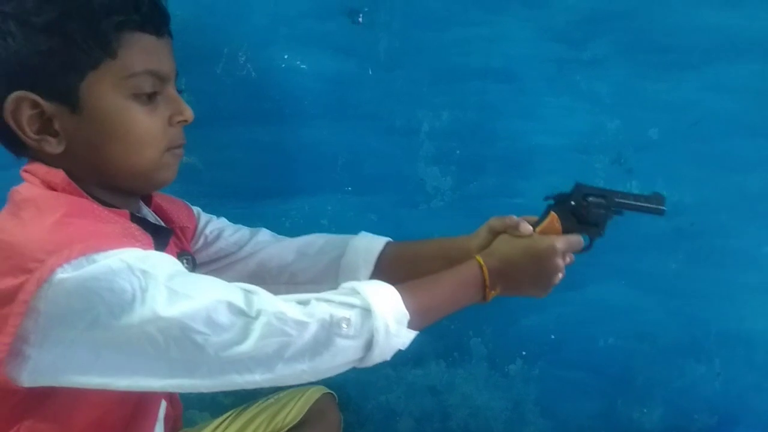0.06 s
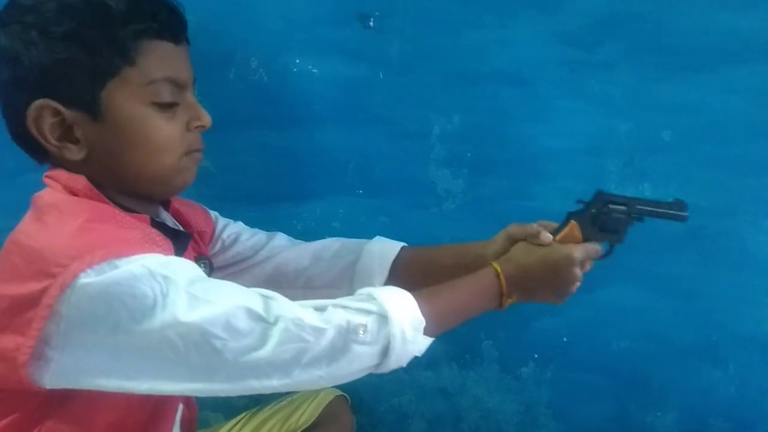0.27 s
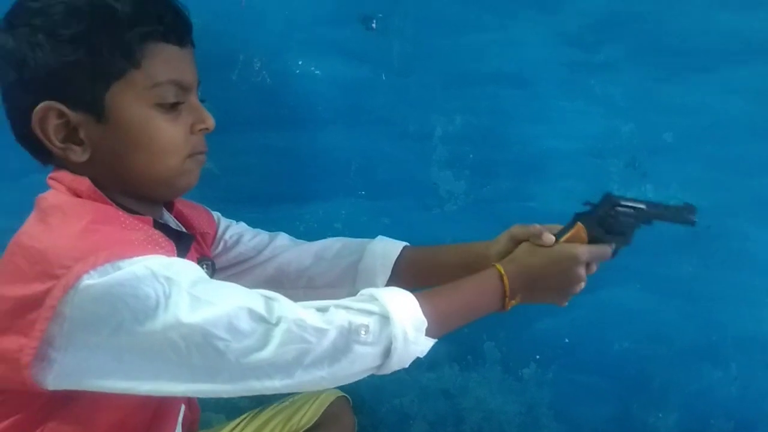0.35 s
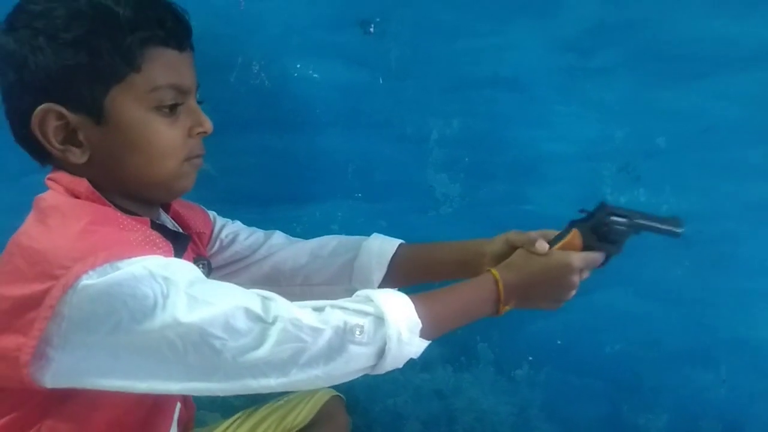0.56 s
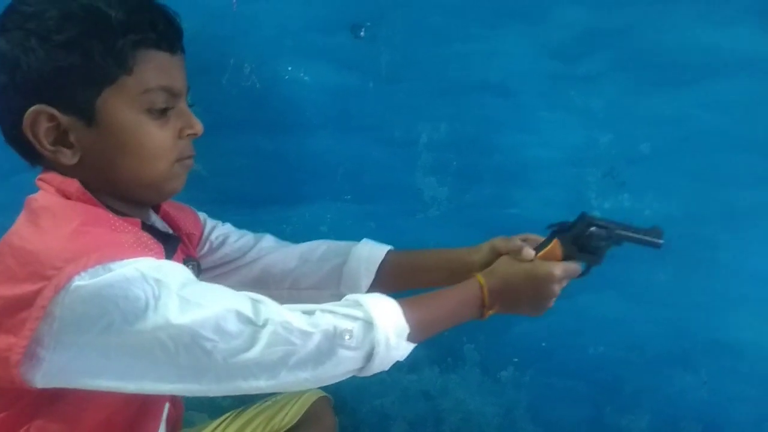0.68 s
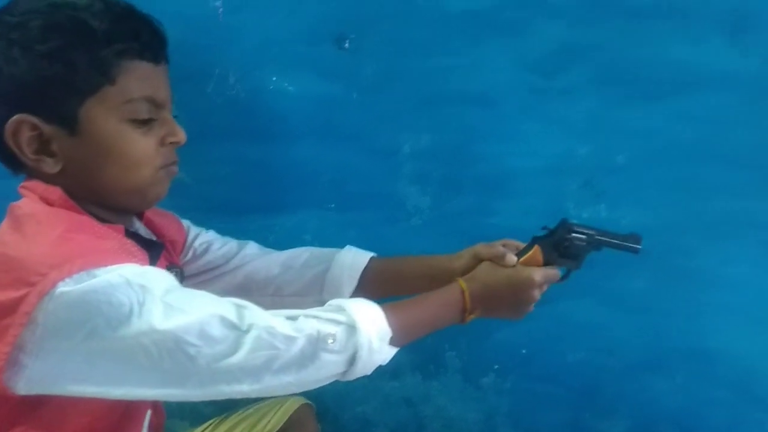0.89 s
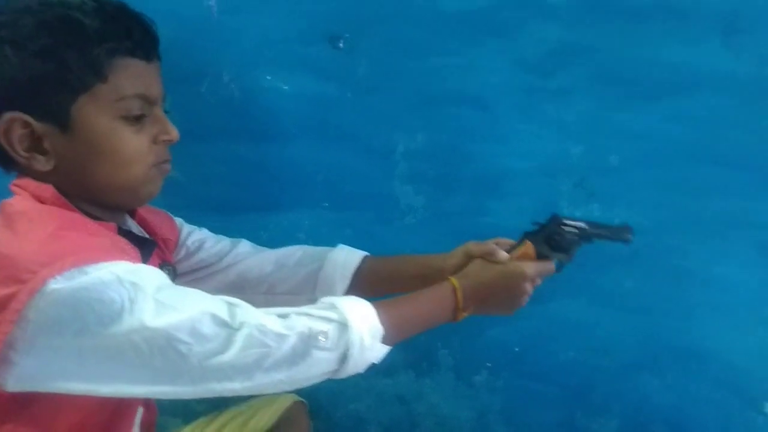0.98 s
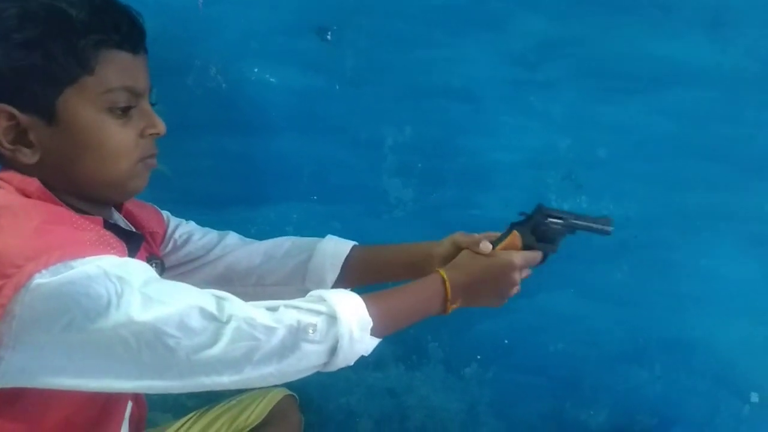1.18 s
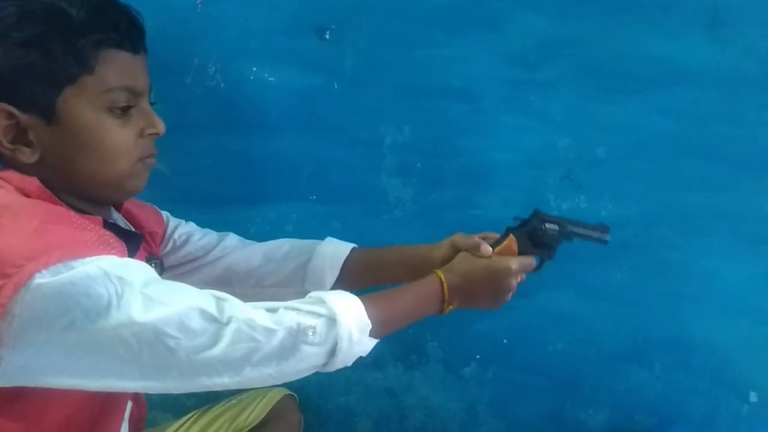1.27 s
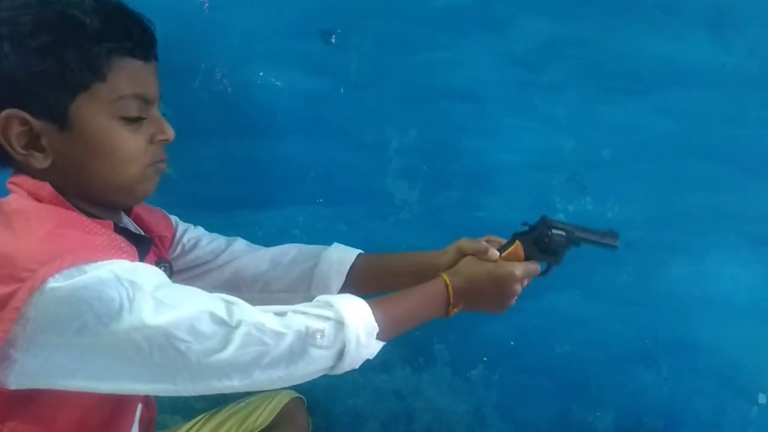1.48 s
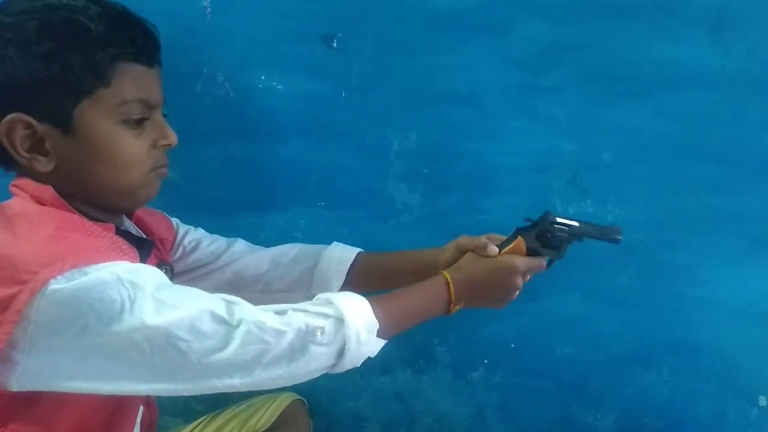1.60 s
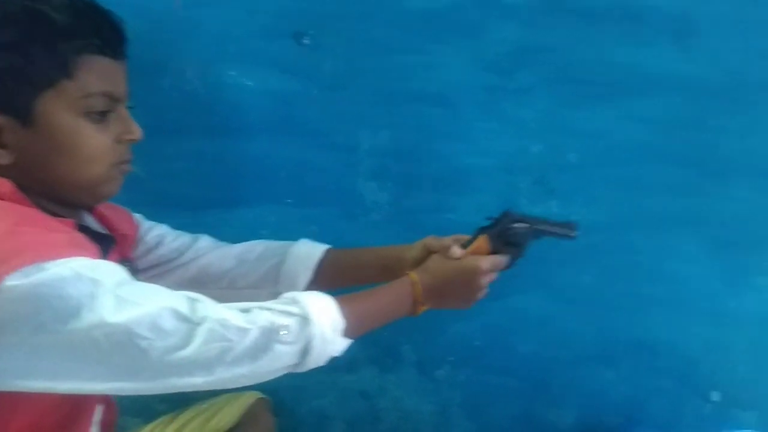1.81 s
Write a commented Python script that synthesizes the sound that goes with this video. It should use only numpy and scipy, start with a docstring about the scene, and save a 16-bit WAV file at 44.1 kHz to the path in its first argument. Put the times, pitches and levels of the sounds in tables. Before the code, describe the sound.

Two loud cap gun bangs over a second apart, with crisp mechanism clicks and ringing echoes

```python
"""In front of a painted wall among hard surfaces, a phone held close hears low hum, rumble and dull outdoor noise.
Faint handling bumps and trigger clicks come first, then a toy revolver fires a ring cap at 0.23 s: a pressure
pulse with a spit of gas, quick echoes, bark, thump and ringing tail, loud enough to overload the microphones.
The cylinder and trigger click as two quick contacts on ringing plastic; the grip creaks at 0.94 s and bumps.
The trigger scrapes, the second cap fires at 1.47 s, and one last click follows in its tail."""
import sys
import numpy as np
from scipy import signal
from scipy.fft import rfft, irfft
from scipy.io import wavfile

SR = 44100
rng = np.random.default_rng(int(sys.argv[2]) if len(sys.argv) > 2 else 0)


def digitize_waveform(pressure):
    """Quantize a signal to 16-bit integers and store it at the path in sys.argv[1].

    Rows of a 2-D input are taken as channels; values are limited to [-1, 1].
    """
    field = np.atleast_2d(pressure).T
    bounded = np.clip(field, -1, 1)
    quanta = np.round(bounded * 32767).astype(np.int16)
    wavfile.write(sys.argv[1], SR, quanta)


N = 81585
T = np.arange(N) / SR
HZ = np.fft.rfftfreq(N, 1 / SR)


def undb(db):
    """Decibels to amplitude gain."""
    return 10 ** (np.asarray(db) / 20)


def unit(x):
    """Scale to rms 1."""
    return x / np.sqrt(np.mean(x ** 2))


def across(points, hz=HZ):
    """Read (Hz, value) points on a log-frequency axis."""
    point_hz, value = np.array(points).T
    return np.interp(np.log(np.maximum(hz, 1)), np.log(point_hz), value)


def level_over_time(points):
    """Gain curve that glides in decibels through (s, dB) points."""
    return undb(np.interp(T, *np.array(points).T))


def fade(start, t60):
    """Sudden onset and exponential decay, down 60 dB after t60 seconds."""
    return (T >= start) * np.exp(-np.log(1000) * np.maximum(T - start, 0) / t60)


def ring(start, hz, t60):
    """One struck mode: a decaying sine."""
    return fade(start, t60) * np.sin(2 * np.pi * hz * (T - start))


# Likeness of left and right before the phone's stereo widening: pitch_hz, correlation
STEREO_LIKENESS = [(100, -0.61), (200, .3), (400, 0.57), (1000, 1), (2000, 0.92), (3100, 0.42),
                   (5000, 0.95), (7500, 0.47), (11000, 0.2), (14000, -0.53)]
# delay of the widener's inverted crossfeed; noise is not widened below this pitch
WIDENER_DELAY_S, IN_PHASE_HZ = 0.0004728, 986


def widen(pair):
    """Two unrelated signals become mid and side; the phone's widener makes them trade places along the treble."""
    widener_swing = np.cos(2 * np.pi * WIDENER_DELAY_S * np.maximum(HZ - IN_PHASE_HZ, 0))
    alike = np.clip(across(STEREO_LIKENESS), -.99, .99) * widener_swing
    shares = np.sqrt(np.array([1 + alike, 1 - alike]) / 2)
    mid, side = irfft(rfft(pair) * shares, N)
    return np.array([mid + side, mid - side])


def opposed(x):
    """The left channel carries the wave; the right carries it inverted and late by the widener's delay."""
    return np.array([x, -np.interp(T - WIDENER_DELAY_S, T, x)])


def noise(colour):
    """Stereo noise of rms 1, coloured by (Hz, dB per Hz) points."""
    coloured = irfft(rfft(rng.standard_normal((2, N))) * undb(across(colour)), N)
    return unit(widen(coloured))


# Electric hum partials: pitch_hz, level_db (before the swell below)
HUM_PARTIALS = [(48.4, -71.5), (120, -80), (145.3, -77.5), (193.8, -67), (291, -75)]
# Swell of the whole hum: time_s, gain_db
HUM_SWELL = [(0, -23), (.45, -5.5), (.9, -2), (1.4, 2), (1.6, -5), (1.85, -18)]
# Colour of the outdoor noise: pitch_hz, relative density_db_per_hz
AIR_COLOUR = [(25, 5), (60, -11.5), (130, -4), (300, -10.5), (700, -11.5), (1300, -15.5), (2200, -18.5),
              (3200, -19), (7000, -31), (14000, -38.5)]
# Loudness of the outdoor noise: time_s, level_db
AIR_LOUDNESS = [(0, -62.5), (.2, -62.5), (.7, -58.5), (1.0, -64), (1.4, -58.5), (1.6, -57.5), (1.85, -61)]


def background():
    """An electric hum of sines with slightly wandering phase, in dull outdoor noise."""
    hum = 0
    for hz, db in HUM_PARTIALS:
        waver = np.interp(T, np.linspace(0, T[-1], num=12), rng.standard_normal(size=12))
        partial = np.sqrt(2) * np.sin(2 * np.pi * hz * T + .2 * waver)
        hum = hum + undb(db) * partial
    air = noise(AIR_COLOUR) * level_over_time(AIR_LOUDNESS)
    return hum * level_over_time(HUM_SWELL) + air


# Colour of the low rumble: pitch_hz, relative density_db_per_hz
RUMBLE_COLOUR = [(30, -6.5), (70, -0.5), (110, -1.5), (150, -2), (200, -16.5), (800, -42)]
# Loudness of the low rumble: time_s, level_db
RUMBLE_LOUDNESS = [(0, -63.5), (.18, -62.5), (.5, -70), (.85, -66.5), (1.2, -62), (1.45, -66), (1.65, -79)]


def low_rumble():
    """Faint bass noise that rises and falls slowly."""
    return noise(RUMBLE_COLOUR) * level_over_time(RUMBLE_LOUDNESS)


# Decay of the surroundings: pitch_hz, t60_s
ROOM_DECAY = [(100, 0.18), (500, 0.42), (1500, 0.57), (3000, 0.48), (7000, 0.48), (14000, 0.28)]
LATE_DB, LATE_T60_S = -32.5, .75  # faint longer ring
ROOM_PATCHY_DB, ROOM_PATCH_HZ = 2, 45.26  # unevenness and its spacing along the spectrum


def room(hits, colour):
    """Diffuse tails of (s, dB) hits: uneven resonances, each octave dying at its own rate, over a longer ring."""
    patches = np.interp(HZ / ROOM_PATCH_HZ, np.arange(1024), rng.standard_normal(size=1024))
    spectrum = rfft(noise(colour)) * unit(undb(ROOM_PATCHY_DB * patches))
    centres = 62.5 * 2. ** np.arange(9)
    out = 0
    for hz, share in zip(centres, np.eye(len(centres))):
        # each octave band crossfades into its neighbours
        band = irfft(spectrum * across(list(zip(centres, share))), N)
        t60 = across(ROOM_DECAY, hz)
        power = 0
        for s, db in hits:
            early = fade(s, t60) ** 2
            late = (undb(LATE_DB) * fade(s, LATE_T60_S)) ** 2
            power = power + undb(db) ** 2 * (early + late)
        out = out + band * np.sqrt(power)
    return out


# Soft bumps of handling: start_s, level_db, t60_s
HANDLING_BUMPS = [(.038, -82, 0.099), (1.069, -59, 0.054), (1.171, -45.5, 0.041), (1.197, -60, 0.061),
                  (1.286, -69, 0.075), (1.452, -45, 0.27)]
# Colour of the bumps: pitch_hz, relative density_db_per_hz
BUMP_COLOUR = [(40, 12.5), (150, 2), (350, -14), (700, -0.5), (1100, -5.5), (2000, -4), (6000, -27)]


def bumps():
    """Dull knocks of handling: low noise with a sudden onset and a decay."""
    return noise(BUMP_COLOUR) * sum(undb(db) * fade(s, t60) for s, db, t60 in HANDLING_BUMPS)


# Tone filter of the creak: pitch_hz, relative gain_db
CREAK_COLOUR = [(100, -5), (240, 0), (500, -13), (1000, -21), (1600, -28), (4000, -45)]
CREAK_S, CREAK_LEN_S = .943, .046
CREAK_HZ, CREAK_RISE = 222.2, .55  # slip rate at the start, fraction gained by the end
CREAK_DB, CREAK_ROOM_DB = -52, -60


def creak():
    """The grip sticks and slips in a train of clicks that quickens as it lets go, with a room echo."""
    progress = np.clip((T - CREAK_S) / CREAK_LEN_S, 0, 1)
    sliding = (progress > 0) & (progress < 1)
    slip_hz = sliding * CREAK_HZ * (1 + CREAK_RISE * progress ** 3)
    # one impulse each time the slip count passes a whole number
    slips = np.diff(np.ceil(np.cumsum(slip_hz) / SR), prepend=0)
    voice = irfft(rfft(slips) * undb(across(CREAK_COLOUR)), N)
    voice = voice / np.std(voice[sliding])
    echo_colour = [(150, -4.5), (300, 10), (1100, 18), (2000, 0), (5000, -21)]  # pitch_hz, density_db_per_hz
    echo = room([(CREAK_S + .012, CREAK_ROOM_DB)], echo_colour)
    return undb(CREAK_DB) * opposed(voice) + echo


# Colour of the trigger scrape: pitch_hz, relative density_db_per_hz
SCRAPE_COLOUR = [(500, -27), (1400, -8.5), (2400, -10), (3400, 1), (4100, -30), (4550, 9), (4900, -24),
                 (12000, -20.5)]
SCRAPE_S, SCRAPE_WIDTH_S, SCRAPE_DB = 1.39, 0.057, -64.5  # centre, spread, peak level


def trigger_scrape():
    """The trigger rubs before the second shot: noise that swells and fades as a bell curve."""
    swell = np.exp(-np.square((T - SCRAPE_S) / SCRAPE_WIDTH_S))
    return noise(SCRAPE_COLOUR) * undb(SCRAPE_DB) * swell


# Trigger, pawl and cylinder clicks: start_s, level_db, second_contact_gap_s, second_contact_db (re first),
# room_db (re first), ring_tilt_db_per_octave
MECHANISM_CLICKS = [(.078, -54, 0.0011, -9, -17, -17.5), (0.107, -64.5, 0.0017, 3, -18, -14),
                    (0.4848, -37.5, 0.0017, 1.5, -12, 13), (0.756, -67, 0.0022, -12, -26, -16),
                    (0.788, -57, 0.0049, -6, -44, -15), (0.8742, -31.5, 0.0014, -1, -15, -11),
                    (1.1286, -29, 0.0029, -5, -16, 5), (1.403, -64.5, 0.0027, 2.5, -17.5, 1),
                    (1.453, -74, 0.007, -13, -11, 1), (1.7316, -40.5, 0.0022, 0.5, -9, 21)]
# Colour of a click and its room: pitch_hz, relative density_db_per_hz
CLICK_COLOUR = [(200, -28), (500, -25), (900, -10.5), (1500, -8.5), (2200, 0), (4000, 1.5), (7200, 3),
                (9500, 0.5), (12000, -8), (14500, -7)]
# Modes of the plastic frame: nominal pitch_hz, level_db (re contact, before tilt), t60_s
FRAME_MODES = [(2390, -22, 0.023), (3180, -10.5, 0.036), (4650, -19, 0.026), (6030, -41, 0.06),
               (7270, -1.5, 0.0083), (7500, -12, 0.017), (8660, -13, 0.0195)]
CLICK_T60_S, CLICK_ECHO_DB, CLICK_ECHO_T60_S = 0.028, -10.5, 0.052
TILT_PIVOT_HZ = 5000


def mechanism():
    """Each click is two quick contacts: noise with an echo, ringing the plastic frame and then the room."""
    frame, power = np.zeros((2, N)), 0  # one frame signal for each contact
    for s, db, gap, second_db, _, tilt in MECHANISM_CLICKS:
        contacts = [(s, undb(db)), (s + gap, undb(db + second_db))]
        for k, (at, gain) in enumerate(contacts):
            direct = fade(at, CLICK_T60_S) ** 2
            echo = (undb(CLICK_ECHO_DB) * fade(at, CLICK_ECHO_T60_S)) ** 2
            power = power + gain ** 2 * (direct + echo)
            for hz, mode_db, t60 in FRAME_MODES:
                tilt_db = tilt * np.log2(hz / TILT_PIVOT_HZ)
                struck_hz = hz * (1 + 0.029 * rng.standard_normal())  # pitch differs at each contact
                frame[k] += gain * undb(mode_db + tilt_db) * ring(at, struck_hz, t60)
    clicks = noise(CLICK_COLOUR) * np.sqrt(power)
    tails = room([(s, db + room_db) for s, db, _, _, room_db, _ in MECHANISM_CLICKS], CLICK_COLOUR)
    return clicks + widen(frame) + tails


# The two caps: start_s, crack_db, tail_db, pulse_db, bark_hz, bark_db, thump_hz, thump_db,
# sway_db, sway_swell_s (time to its peak)
CAP_SHOTS = [(0.2325, -10.5, -14.5, 0, 850, -15, 237, -8.5, -20.5, .008),
             (1.4731, -12.5, -17.5, -0.5, 1030, -13, 170, -5, -16, 0.0032)]
# Direct path and echoes off the nearest surfaces: delay_s, level_db
ECHO_PATHS = [(0, 2.5), (.003, -8), (.0075, -2.5), (.0098, -2), (0.0125, -5.5)]
# Colour of the gas spit: pitch_hz, relative density_db_per_hz
GAS_COLOUR = [(100, 8.5), (600, 0.5), (1300, 4.5), (2400, 3), (4000, 1.5), (5000, 0.5), (6500, -5.5),
              (10000, -3), (14000, -14)]
# Colour of the short boom: pitch_hz, relative density_db_per_hz
BOOM_COLOUR = [(30, -27), (70, -6), (150, -3.5), (280, 6.5), (400, -6), (650, -5.5), (1000, -16.5),
               (2000, -43.5)]
# Colour of the ringing tail: pitch_hz, relative density_db_per_hz
TAIL_COLOUR = [(60, -33), (150, -8.5), (300, -5), (500, -5.5), (1100, -2.5), (1700, 0.5), (2700, 2.5),
               (4000, -3), (5000, -3.5), (6200, -6.5), (10000, -6.5), (14000, -15.5)]
PULSE_S, PULSE_ECHO_DB = 0.00038, -5.5  # pulse time scale; extra loss of the pulse after a bounce
GAS_T60_S, BARK_T60_S, THUMP_T60_S = 0.035, 0.041, 0.049
BOOM_DB, BOOM_T60_S = -5, 0.041  # boom level relative to the crack
THUMP_SHARED_DB = -11.5  # extra thump that is alike in both channels
SWAY_HZ = 65


def caps():
    """Pulse and gas arrive by several paths; bark, thump, a short boom and a low sway sound once, then the room."""
    gas, low = noise(GAS_COLOUR), noise(BOOM_COLOUR)[0]
    out = 0
    for s, crack_db, _, pulse_db, bark_hz, bark_db, thump_hz, thump_db, sway_db, swell in CAP_SHOTS:
        pulse, gas_power = 0, 0
        for k, (delay, db) in enumerate(ECHO_PATHS):
            at = s + delay
            age = np.maximum(T - at, 0) / PULSE_S
            bounce_db = PULSE_ECHO_DB if k else 0
            # sudden pressure jump that swings past zero and recovers
            blast = (T >= at) * (1 - age) * np.exp(-age)
            pulse = pulse - undb(db + pulse_db + bounce_db) * blast
            gas_power = gas_power + (undb(db + crack_db) * fade(at, GAS_T60_S)) ** 2
        bark = undb(bark_db) * ring(s, bark_hz, BARK_T60_S)
        thump = undb(thump_db) * ring(s, thump_hz, THUMP_T60_S)
        boom = undb(crack_db + BOOM_DB) * low * fade(s, BOOM_T60_S)
        since = np.maximum(T - s, 0)
        sway_shape = since / swell * np.exp(1 - since / swell)
        sway = undb(sway_db) * sway_shape * np.sin(2 * np.pi * SWAY_HZ * since)
        opposed_wave = opposed(pulse - thump + boom + sway)
        shared_wave = -bark - undb(THUMP_SHARED_DB) * thump
        out = out + gas * np.sqrt(gas_power) + opposed_wave + shared_wave
    return out + room([(s + .003, tail_db) for s, _, tail_db, *_ in CAP_SHOTS], TAIL_COLOUR)


def scene():
    """Background and rumble, then handling, mechanism and the shots on top."""
    surroundings = background() + low_rumble()
    handling = bumps() + creak()
    return surroundings + handling + trigger_scrape() + mechanism() + caps()


LOW_CUT_HZ, TOP_HZ = 42, 14250


def record(dry):
    """The phone thins the deep bass, flattens the loudest peaks and cuts the top."""
    bass_cut = signal.butter(4, LOW_CUT_HZ, "high", fs=SR, output="sos")
    flattened = np.tanh(signal.sosfilt(bass_cut, dry))
    top_cut = signal.ellip(8, .2, 80, TOP_HZ, fs=SR, output="sos")  # 0.2 dB ripple, 80 dB rejection
    return signal.sosfilt(top_cut, flattened)


dry = scene()
out = record(dry)
digitize_waveform(out)
```